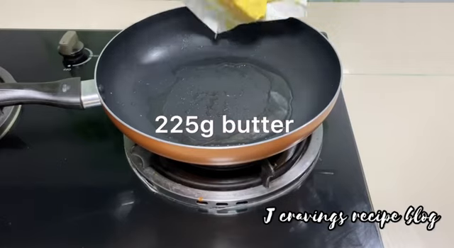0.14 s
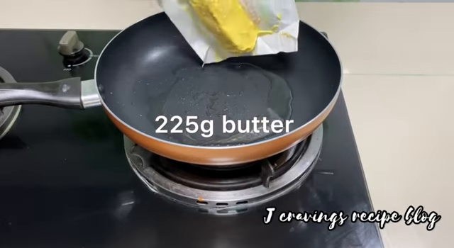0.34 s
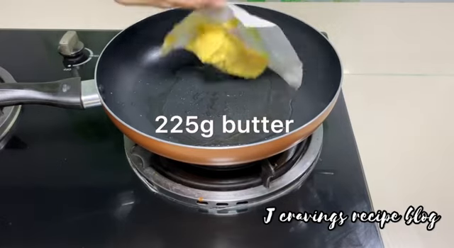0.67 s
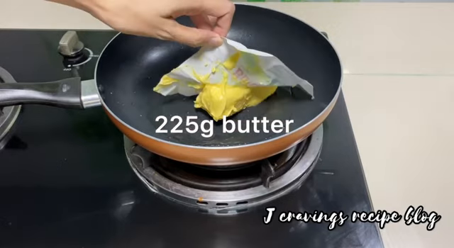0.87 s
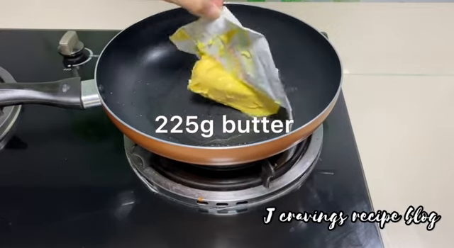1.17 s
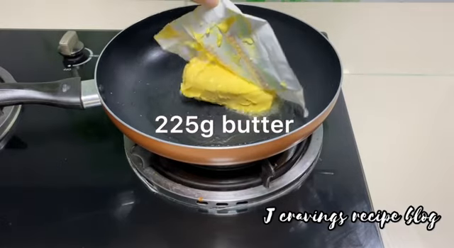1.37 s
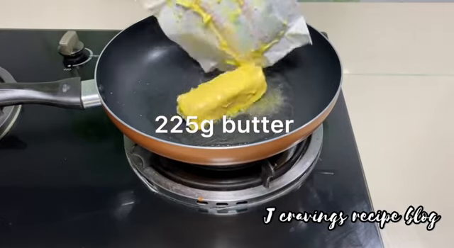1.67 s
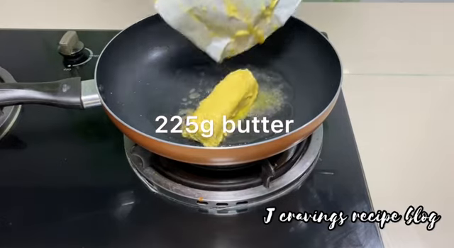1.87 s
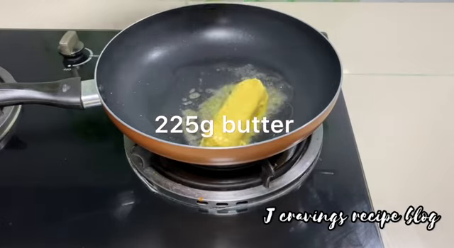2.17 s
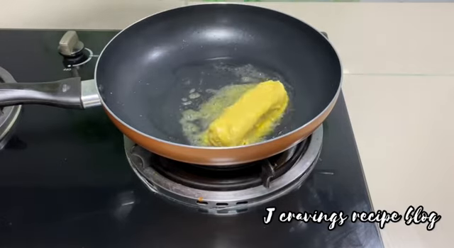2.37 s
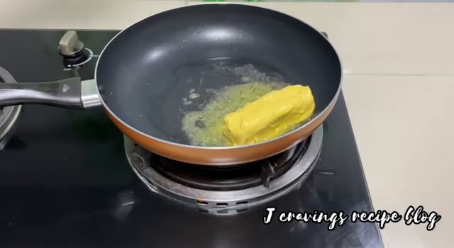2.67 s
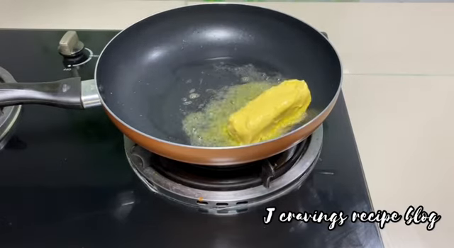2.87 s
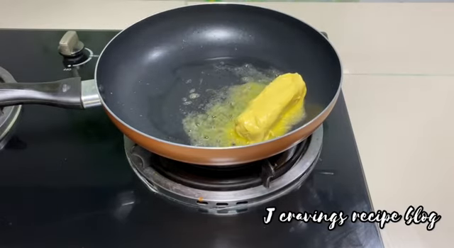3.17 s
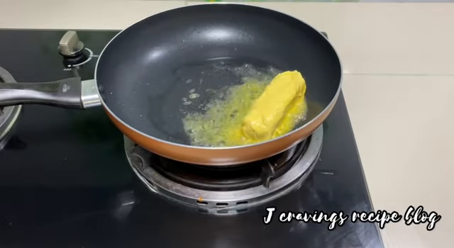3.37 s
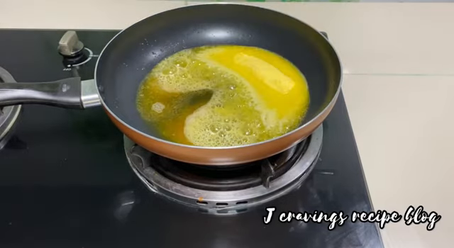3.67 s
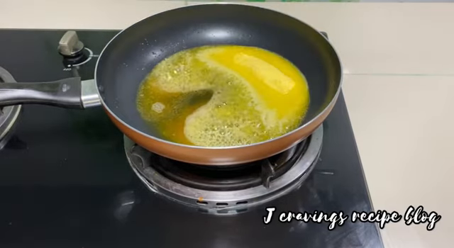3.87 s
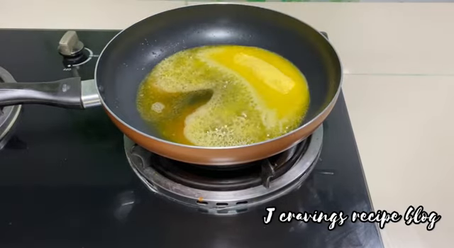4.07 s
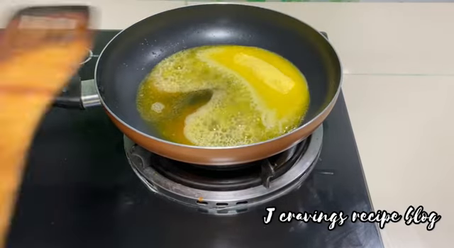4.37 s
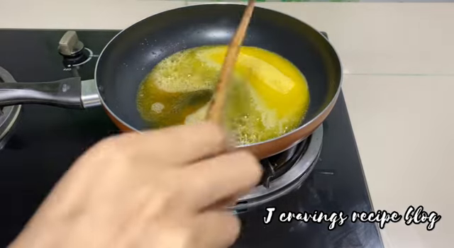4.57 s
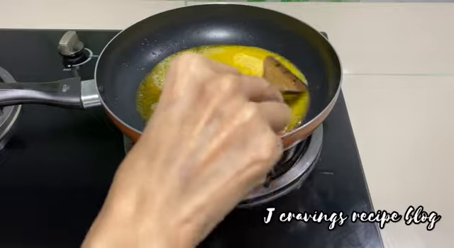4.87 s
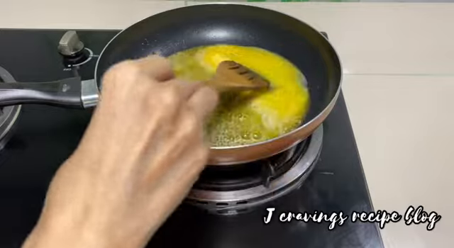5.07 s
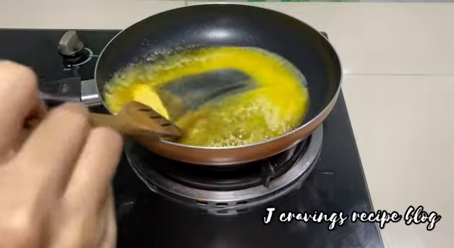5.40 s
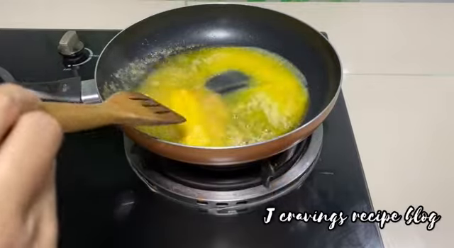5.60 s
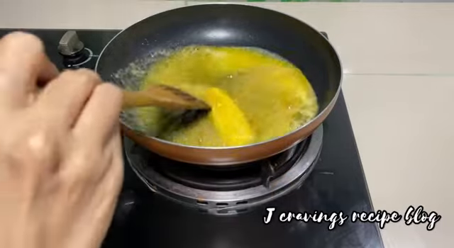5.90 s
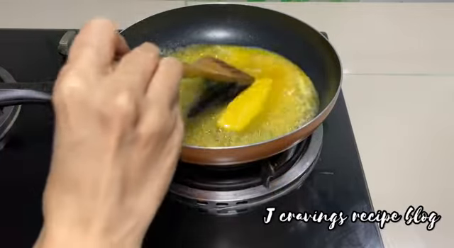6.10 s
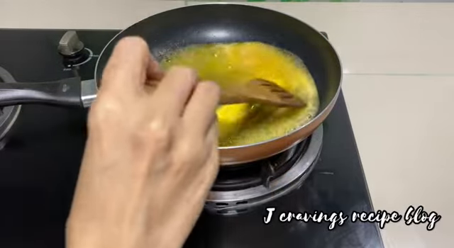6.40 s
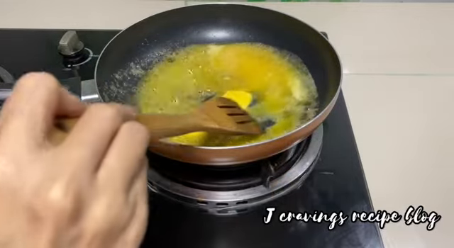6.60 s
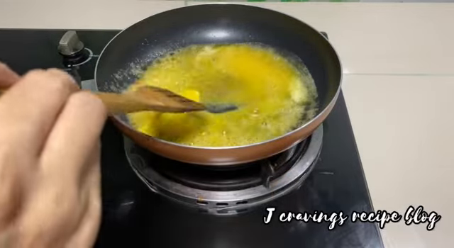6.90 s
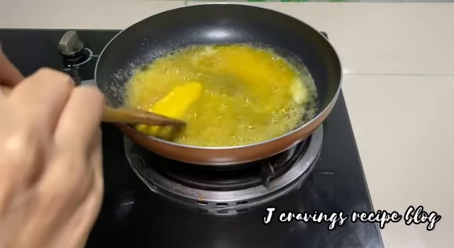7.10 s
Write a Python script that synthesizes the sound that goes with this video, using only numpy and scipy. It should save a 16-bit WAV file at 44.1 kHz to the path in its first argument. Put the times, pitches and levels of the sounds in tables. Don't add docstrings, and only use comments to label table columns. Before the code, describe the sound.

A soft block of butter thuds into a frying pan, spits and crackles, then bubbles as melted fat and sizzles louder under a wooden spatula.

```python
import sys
import numpy as np
from scipy import signal
from scipy.fft import rfft, irfft, next_fast_len
from scipy.io import wavfile
from scipy.ndimage import map_coordinates

SR = 44100
rng = np.random.default_rng(int(sys.argv[2]) if len(sys.argv) > 2 else 0)


def wav_record(signal):
    frames = np.transpose(np.atleast_2d(signal))
    bounded = np.clip(frames, -1, 1)
    quanta = np.round(bounded * 32767).astype(np.int16)
    wavfile.write(sys.argv[1], SR, quanta)


def linear_from_db(decibels):
    return 10 ** (np.asarray(decibels, float) / 20)


N = 319725

CUT_S = 3.573
POOL_START_S, POOL_END_S = 3.6, 5.25
# f/Hz, lead/rad
MIDDLE_LEAD = [(300, 0), (1400, .6), (2750, 1.8), (4100, 2.5), (5500, 3.1), (6200, 3.9), (6900, 6.2),
               (7600, 5.8), (8300, 3.5), (9650, 2.7), (10300, .6), (11000, 0)]


def unit(x):
    return x / np.sqrt(np.mean(x ** 2) + 1e-20)


def along(points, hz):
    f, v = np.transpose(points)
    return np.interp(np.log(hz + 1), np.log(f + 1), v)


def curves(rows):
    s, *cols = np.transpose(rows)
    return [np.interp(np.arange(N) / SR, s, c) for c in cols]


def spans(rows):
    t = np.arange(N) / SR
    fade_s = 0.26
    return [top * np.clip(np.minimum(t - a, b - t) / fade_s + .5, 0, 1) for a, b, top in rows]


def wobble(rate):
    knots = rng.standard_normal(int(N * rate / SR) + 4)
    return map_coordinates(knots, [np.arange(N) * rate / SR])


def filtered(x, response):
    m = next_fast_len(N + SR // 2)
    return irfft(rfft(x, m) * response(np.fft.rfftfreq(m, 1 / SR)), m)[..., :N]


def peak(f, hz, width_hz):
    return 1j * f * width_hz / (hz * hz - f * f + 1j * f * width_hz)


def rush(spectrum):
    # f/Hz, likeness (0-1)
    alike = [(60, 0.91), (130, 0.92), (270, 0.34), (580, 0.2), (12000, 0.095)]

    def shape(hz):
        turn = np.arccos(np.clip(along(alike, hz), -1, 1)) / 2
        return linear_from_db(along(spectrum, hz)) * [np.cos(turn), np.sin(turn)]

    mid, side = filtered(rng.standard_normal((2, N)), shape)
    return unit(np.array([mid + side, mid - side]))


def bursts(s, hz, size, cycles, count, phase=0):
    k = np.arange(count)
    turns = hz[:, None] * k / SR
    wave = size[:, None] * np.sin(2 * np.pi * turns + np.reshape(phase, (-1, 1)))
    wave = wave * np.exp(-turns / cycles) * (1 - np.exp(-turns / 0.24))
    where = np.round(s * SR).astype(int)[:, None] + k
    return np.bincount(where.ravel(), wave.ravel(), N + count)[:N]


def engine():
    # t/s, firing f/Hz, level/dB, overtone level (load)/dB
    firing = [(0, 60, -48.5, -6), (.3, 62, -40.5, -3), (.41, 65, -51.5, 17.5), (.52, 66, -35, -5),
              (.72, 67, -38, -4), (.87, 67.5, -32, -1.5), (.96, 68, -41.5, 3), (1.43, 68.5, -39.5, 4),
              (1.55, 69, -53, -5.5), (3.5, 70, -56.5, -5.5), (3.62, 72, -53, -1.5), (5.7, 73, -52, -4),
              (6.1, 69, -53.5, -0.5), (7.25, 74, -50, -4)]
    # multiple of firing f, level/dB
    overtones = [(2, -11.5), (3, -22), (4, -12.5)]
    # t/s, half length/s, level/dB
    throbs = [(1.81, 0.12, 7.5), (1.99, 0.091, 9.5), (2.297, .05, 4), (2.481, 0.1, 8), (2.778, 0.095, 14),
              (3.218, 0.06, 14.5), (3.389, 0.028, 15.5), (3.72, 0.12, 11.5), (3.953, 0.14, 9),
              (4.253, 0.078, 13.5), (4.6, 0.04, 7), (4.855, 0.069, 7.5), (5.405, .1, 7), (5.861, 0.031, 9),
              (6.03, 0.14, 6.5), (6.45, 0.067, 8.5), (6.795, 0.13, 10.5), (7.22, 0.052, 12.5)]
    t = np.arange(N) / SR
    hz, tone_db, load_db = curves(firing)
    tone_db = tone_db + sum(db * np.exp(-((t - s) / half) ** 2) for s, half, db in throbs)
    turn = 2 * np.pi * np.cumsum(hz + 2.473 * wobble(18)) / SR
    tone = np.sin(turn)
    for k, db in overtones:
        tone += linear_from_db(db + load_db + 1.5 * wobble(5.5)) * np.sin(k * turn)
    waver_db = 5
    return linear_from_db(tone_db + 2.5 + waver_db * wobble(6.7) / 4) * tone


def room_noise():
    # f/Hz, level per Hz/dB
    rumble = [(15, -70), (25, -8.5), (41, -11), (59, 1.5), (92, 1), (242, -1), (399, -9.5), (500, -37),
              (650, -90), (1100, -120)]
    # f/Hz, level per Hz/dB
    air = [(180, -32), (300, -8), (397, -11), (436, -7), (1160, -11.5), (1710, -23), (4550, -37),
           (5930, -32.5), (6610, -42.5), (11000, -40), (12300, -33), (16000, -100), (22000, -120)]
    # start t/s, end t/s, level/dB
    busy = [
        (-.2, .55, 2),
        (.7, 1.8, 6),
        (1.95, 2.2, 2),
        (2.6, 3.55, -2),
        (5.3, 6.05, 6.5),
        (6.05, 7.25, 3),
    ]
    air_db = -51.5 + sum(spans(busy))
    low = linear_from_db(-47 + 2 + 1.5 * wobble(8.1)) * rush(rumble)
    return low + linear_from_db(air_db + 1.5 + 0.64 * wobble(8.6)) * rush(air)


def burner_jet():
    hz, width_hz, db = 5850, 230, -64
    noise = rng.standard_normal((2, N))
    return linear_from_db(db) * unit(filtered(noise, lambda f: peak(f, hz, width_hz) ** 2))


def wrapper_rustle():
    hz, width_hz, db, t60_s = 3200, 4000, -46.5, 0.16
    noise = unit(filtered(rng.standard_normal((2, N)), lambda f: peak(f, hz, width_hz) ** 2))
    return linear_from_db(db - 60 * np.arange(N) / SR / t60_s) * noise


def kitchen(x):
    # f/Hz, t60/s
    decay = [(200, 0.13), (2000, 0.75), (10000, 0.045)]
    hz, t, z = signal.stft(rng.standard_normal((2, SR // 2)), SR, nperseg=256)
    tail = signal.istft(z * linear_from_db(-60 * t / along(decay, hz)[:, None]), SR, nperseg=256)[1]
    late = np.pad(x, (100, 0))[None]
    return signal.fftconvolve(late, tail / np.linalg.norm(tail[0]), axes=1)[:, :N]


def rubbing():
    # start t/s, length/s, level/dB, f/Hz, width/Hz
    rubs = [
        (1.391, 0.48, -49, 562.7, 230),
        (2.02, 0.15, -61.5, 800, 350),
        (4.946, 0.23, -39.5, 615, 4),
        (5.607, 0.21, -51, 590, 34.8),
        (5.896, 0.16, -51.5, 604, 196.4),
    ]
    glides = [258.5, -61, -150, 509, -49]
    rises = [.3, .2, .03, .2, .2]
    total = np.zeros(N)
    for (s, length, db, hz, width_hz), glide, rise in zip(rubs, glides, rises):
        rough = width_hz / 107
        t = np.arange(N) / SR - s
        fade_s = 0.027 + 0.13 * length
        on = np.clip(np.minimum(t / (rise * length), (length - t) / fade_s), 0, 1)
        turn = 2 * np.pi * (hz + glide * t / 2) * t
        song = (0.43 + rough * wobble(width_hz)) * np.cos(turn) + rough * wobble(width_hz) * np.sin(turn)
        total += on * linear_from_db(db + 2.5 * wobble(16)) * song
    return total


def knocks():
    # f/Hz, width/Hz, level/dB
    modes = [(505, 160, -9.5), (684, 19, 1.5), (1140, 210, -6), (1920, 35, -2), (2410, 230, -5.5)]
    # t/s, peak level/dB, crack level/dB, ring level/dB, upper ring level/dB
    slaps = [
        (0.6815, -28.5, 4.5, -18, -16),
        (0.697, -12, -8, -3, -9),
        (0.705, -24.5, -14, 1, -15),
        (0.738, -22.5, -3.5, -6, -10),
        (0.749, -28.5, -15, -4, -13),
        (0.768, -24, -13.5, -0.5, -14),
        (0.7726, -27.5, -9, 2, -22),
        (0.777, -31.5, 1, 4, -13),
        (0.789, -28, 1.5, -4, -13),
    ]
    # t/s, peak level/dB, top f/Hz, thud level/dB
    taps = [
        (3.912, -37, 830, 0.5),
        (4.925, -43, 330, 3),
        (4.887, -26, 1313, -3.5),
        (4.905, -33.5, 710, -2),
        (5.799, -39, 666, 3.5),
        (5.815, -44, 533, 5),
        (5.816, -48, 350, 9.5),
    ]
    tap_crack_db = -13
    blows, cracks = np.zeros((2, N + SR))
    hits = [(s, db, crack_db) for s, db, crack_db, *_ in slaps]
    hits += [(s, db, tap_crack_db) for s, db, *_ in taps]
    t = np.arange(SR // 20) / SR
    for s, db, crack_db in hits:
        i = round(s * SR)
        force = linear_from_db(db + 20.5 - 60 * t / 0.011) * np.minimum(t / 0.00045, 1)
        blows[i:i + len(t)] += force * rng.standard_normal(len(t))
        cracks[i:i + len(t)] += linear_from_db(db + crack_db - 60 * t / 0.015) * rng.standard_normal(len(t))

    s, db, _, ring_db, upper_db = np.transpose(slaps)
    thuds = bursts(s, 295 + 0 * s, linear_from_db(db - 30.5 + 6), cycles=1.3, count=6000)
    thuds += bursts(s, 1162 + 0 * s, linear_from_db(db + ring_db), cycles=2.5, count=2000)
    thuds += bursts(s, 2390 + 0 * s, linear_from_db(db + upper_db), cycles=4.1, count=1000)

    parts, sag_s = 20, .03
    s, db, top_hz, thud_db = np.repeat(taps, parts, axis=0).T
    depth = (np.arange(len(s)) % parts + rng.random(len(s))) / parts
    s = s + sag_s * depth * rng.random(len(s)) ** 2
    thuds += bursts(s, top_hz / 5 ** depth, linear_from_db(db + thud_db + 0.27 * depth), cycles=2.18, count=6000)

    soft = filtered(blows[:N], lambda f: 5.0 / (1 + 1j * f / 900) ** 2)
    blows = np.where(np.arange(N) < CUT_S * SR, blows[:N], soft)

    def pan(f):
        return sum((-1) ** k * linear_from_db(db) * peak(f, hz, w) for k, (hz, w, db) in enumerate(modes))

    return filtered(blows, pan) + thuds + filtered(cracks[:N], lambda f: peak(f, 4200, 5000))


def broad_clicks():
    # t/s, peak level/dB
    ticks = [(.6815, -23.5), (1.834, -23), (2.0049, -29), (2.1675, -22), (2.4, -21), (2.4455, -26),
             (2.6325, -16), (2.8632, -23), (2.9405, -25), (3.4428, -29), (4.247, -21), (4.374, -36),
             (4.617, -29)]
    lowest_hz, lead_lost = 1500, 0.68
    s, db = np.transpose(ticks)
    spikes = np.bincount(np.round(s * SR).astype(int), linear_from_db(db + 6), N)

    def response(f):
        aside = np.exp(-.5j * lead_lost * along(MIDDLE_LEAD, f) * [[1], [-1]])
        return (1j * f / (1j * f + lowest_hz)) ** 2 * aside

    return filtered(spikes, response)


def pops():
    # t/s, peak level/dB, f/Hz, left lead/rad
    large = [(0.8845, -26, 10600, -4.5), (1.0813, -18.5, 10250, 3), (1.1422, -26, 11100, 4.5),
             (1.2368, -25.5, 6860, 0), (1.2597, -29.5, 7760, 1), (1.354, -30, 10900, -2),
             (1.4309, -16.5, 4740, 4), (1.4583, -18.5, 10300, -6), (1.6679, -18, 10800, 4),
             (1.7272, -24, 10700, 0), (1.834, -24.5, 11200, 5.5), (1.9384, -29, 4090, 1.5),
             (1.9706, -20.5, 10470, 3.5), (2.0041, -27.5, 7400, 1), (2.123, -30, 3940, -1.5),
             (2.167, -19, 7150, 1.5), (2.276, -30.5, 4130, 4.5), (2.3047, -25, 11200, 4),
             (2.3497, -28, 7200, 0.5), (2.4004, -20.5, 5950, 2.8), (2.446, -26, 7440, 2),
             (2.5, -30.5, 7830, 0.5), (2.5813, -29, 9970, -1.5), (2.6312, -18, 11600, 5.5),
             (2.7783, -29.5, 4850, -1.8), (2.8634, -24, 5900, 2.2), (2.94, -19.5, 5260, 4),
             (2.955, -29, 5500, 2), (3.0737, -35, 6500, 1), (3.1695, -30.5, 3740, 1),
             (3.2599, -34.5, 4470, -0.5), (3.3715, -32, 4900, 2.5), (3.443, -23.5, 5420, 2.5),
             (3.5826, -49, 3400, 5)]
    # t/s, peak level/dB, f/Hz, left lead/rad
    further_large = [
        (2.165, -23, 5850, 1.5),
        (2.172, -34, 6250, 1),
        (2.947, -23.5, 5060, 0.85),
        (2.962, -36, 5300, 1.2),
        (2.975, -30, 5420, 1.8),
    ]
    # t/s, peak level/dB, f/Hz
    gurgles = [(3.609, -47, 3500), (3.6636, -24.5, 3080), (3.7226, -30, 3570), (3.922, -22, 3420),
               (4.0074, -24, 3500), (4.1943, -33, 2790), (4.2449, -33, 2670), (4.4947, -24.5, 3280),
               (4.6155, -21, 3110), (4.641, -24.5, 3140), (4.732, -28, 2720), (4.7441, -27.5, 3330),
               (4.8183, -24, 3900), (4.8715, -20, 2750), (4.9278, -23.5, 3590), (4.9519, -25.5, 3140),
               (4.9817, -20, 3250), (5.1229, -22.5, 3380), (5.1435, -23, 2290), (5.1683, -25, 1960),
               (5.2423, -18.5, 3376), (5.293, -30, 10900), (5.3167, -18, 10220), (6.4254, -16.5, 4420),
               (6.529, -12.5, 6540), (7.005, -25, 4100)]
    # t/s, peak level/dB, f/Hz
    further_pops = [(0.6639, -44, 3500), (2.3321, -39, 6700), (2.3531, -33, 4100), (2.5915, -36, 7650),
                    (2.7596, -35, 4650), (2.8469, -30, 5500), (3.3353, -37, 3670), (3.7084, -28, 3740),
                    (3.7968, -28, 4600), (4.4164, -26.5, 2780), (4.8359, -18, 3770), (5.0554, -29, 3130),
                    (5.4331, -17, 4800)]
    delay_s, spray_s, copies = .0007, .028, 10
    placed, central = np.r_[large, further_large], np.r_[gurgles, further_pops]
    aside = np.r_[placed[:, 3] - along(MIDDLE_LEAD, placed[:, 2]), np.zeros(len(central))]
    aside = np.angle(np.exp(1j * aside))
    rows = np.c_[np.r_[placed[:, :3], central], aside]
    s, db, hz, aside = np.repeat(rows, copies, axis=0).T
    draw = rng.random((len(s), 2))
    later = np.arange(len(s)) % copies > 0
    s = s + delay_s + later * spray_s * draw[:, 0] ** 2.3
    hz = np.minimum(hz * (1 + later * 0.4 * (draw[:, 1] - .5)), 11800)
    db = db + 5.0 - later * (6 + 12 * draw[:, 0]) - 3 * (s > CUT_S)
    snap = bursts(s, .6 * hz, ~later * linear_from_db(db - 1.0), cycles=0.24, count=64)
    ring = [bursts(s, hz, linear_from_db(db), cycles=5.4, count=128, phase=side * aside / 2) for side in (1, -1)]
    return filtered(snap + ring, lambda f: (1j * f / (1j * f + 1100)) ** 2)


def sizzle():
    # f/Hz, log spread, bursts/s, level over the boil/dB, share of the fineness followed
    sizes = [(1647, 0.22, 400, -12, -0.25), (2388, .25, 900, -7.5, -0.29), (3153, .15, 300, -13, -.2),
             (4430, 0.19, 1700, 1.5, -0.1), (6390, 0.24, 2000, -2.5, .8), (9730, 0.17, 2500, 0.5, 1)]
    pool_gains = [-3.5, 0, 9, 0, -1, 1.5]
    # t/s, width (0-1)
    spread_of_patch = [(0, .3), (1.9, .3), (2.1, .75), (3.56, .75), (3.58, .25), (5.25, .25), (5.35, .65),
                       (7.25, .6)]
    # t/s, level/dB, fineness (tiny over middle bubbles)/dB
    boil = [(0.72, -46, -6), (0.85, -51.5, 1.5), (1.19, -52.5, 8), (1.5, -46.5, 4.5), (1.85, -49, 6.5),
            (2.9, -55, 7), (3.55, -53.5, 1.5), (3.6, -43, -7), (4.2, -44.5, -8), (4.87, -41, -12.5),
            (5.21, -47, -8), (5.32, -42, 3.5), (5.43, -37.5, 10), (5.62, -37.5, -2), (5.8, -34, 0.5),
            (6.5, -36.5, -2), (7.14, -40, -8.5), (7.25, -43, -5.5)]
    # start t/s, end t/s, level/dB
    strokes = [
        (.7, 1.75, 10.5),
        (2.2, 3.5, 0.5),
        (4.5, 4.95, -4),
        (5.0, 5.25, 2.5),
        (5.4, 5.75, 8.5),
        (6.7, 7.2, 6),
    ]
    fits = .7 * wobble(14) + 1.3 * wobble(45)
    patch, = curves(spread_of_patch)
    boil_db, fine_db = curves(boil)
    stroke_db = sum(spans(strokes))
    deep, = spans([(POOL_START_S, POOL_END_S, 1)])
    total = np.zeros((2, N))
    for (hz, spread, rate, over_db, share), pool_db in zip(sizes, pool_gains):
        bigness = np.clip(np.log(4000 / hz) / 0.8, 0, 1)
        level_db = boil_db + over_db + pool_db * deep + share * fine_db + stroke_db * bigness
        draw = rng.random((int(rate) * N // SR, 3))
        pitch = np.minimum(hz * np.exp(spread * rng.standard_normal(len(draw))), .3 * SR)
        size = linear_from_db(np.minimum(-3.8 * np.log(1 - draw[:, 1]), 17))
        s = draw[:, 0] * N / SR
        lag = 1.2e-4 * (draw[:, 2] - .5) * patch[(draw[:, 0] * N).astype(int)]
        count = min(96, int(8 * SR / hz))
        grains = [bursts(s + np.maximum(side * lag, 0), pitch, size, cycles=2.0, count=count)
                  for side in (1, -1)]
        hiss = rng.standard_normal(N) + 1.3 * patch * rng.standard_normal((2, N))
        blur = filtered(hiss, lambda f: np.exp(-(np.log((f + 1) / hz) / (0.93 * spread)) ** 2 / 2))
        mixed = unit(unit(np.array(grains)) + .8 * unit(blur))
        total += linear_from_db(level_db + 5.5 + fits + 1.2 * wobble(18)) * mixed
    total = filtered(total, lambda f: f ** 4 / (f ** 4 + 1650 ** 4))
    return total * np.clip((np.arange(N) / SR - .68) / .02, 0, 1)


def scene():
    # f/Hz, lead/rad
    stirred_lead = [(300, 0), (1400, .9), (2750, 2.1), (3450, 2.9), (4100, 4), (5500, 4), (6200, 5.9),
                    (6900, 6.3), (7600, 5.8), (8300, 3.5), (9650, 2.7), (10300, .6), (11000, 0)]
    push_s = 5.28
    pan = sizzle() + knocks() + rubbing() + pops() + broad_clicks()
    early, late = [filtered(pan, lambda f: np.exp(.5j * along(lead, f) * [[1], [-1]]))
                   for lead in (MIDDLE_LEAD, stirred_lead)]
    direct = np.where(np.arange(N) < push_s * SR, early, late)
    echo = linear_from_db(-13) * kitchen(pan.mean(0))
    background = engine() + room_noise() + burner_jet() + wrapper_rustle()
    mix = direct * linear_from_db([[.6], [-.6]]) + echo + background
    dip_db, half_width_s = -14, .008
    return mix * linear_from_db(dip_db * np.clip(1 - abs(np.arange(N) / SR - CUT_S) / half_width_s, 0, 1))


def top_cut(x):
    return signal.sosfilt(signal.butter(12, 12660, fs=SR, output="sos"), x)


def record(dry):
    return top_cut(dry)


dry = scene()
out = record(dry)
wav_record(out)
```